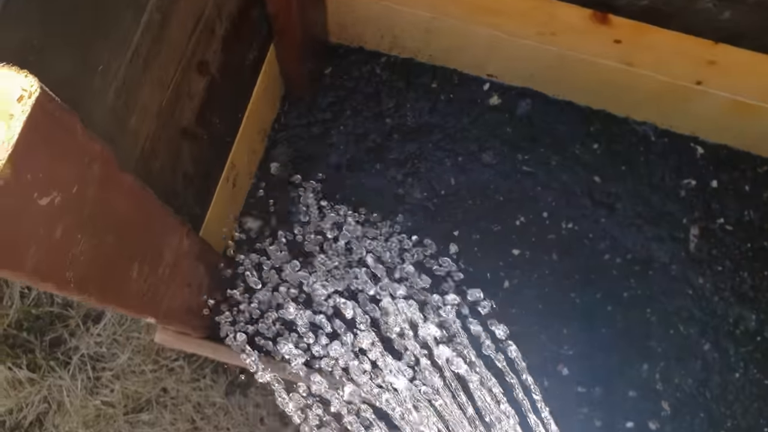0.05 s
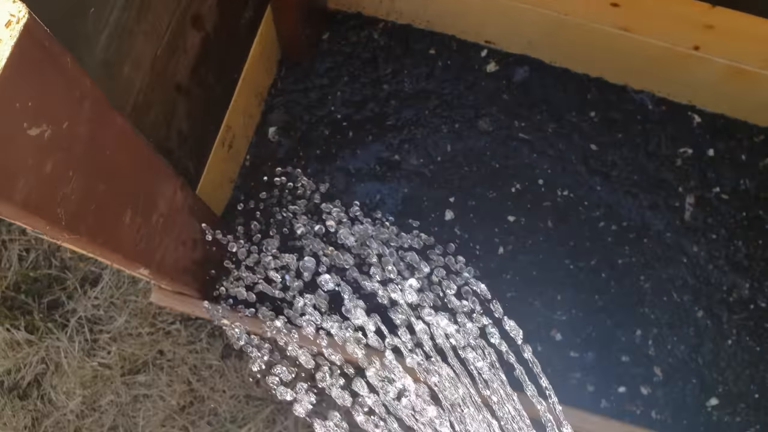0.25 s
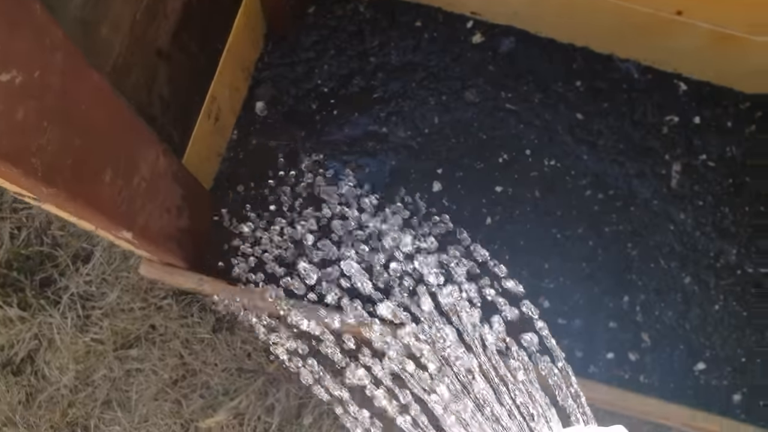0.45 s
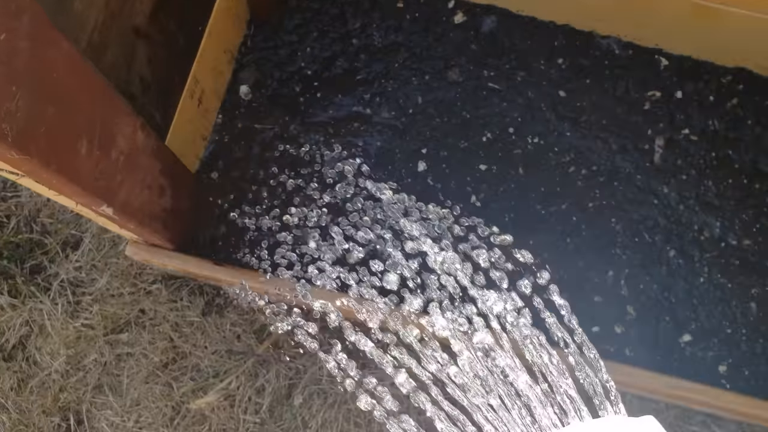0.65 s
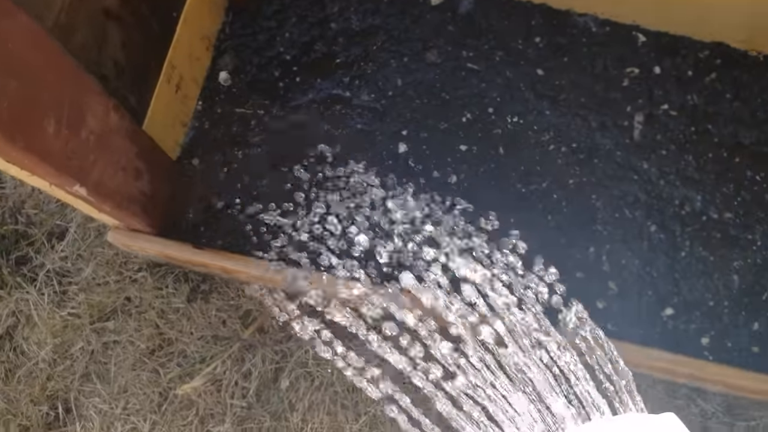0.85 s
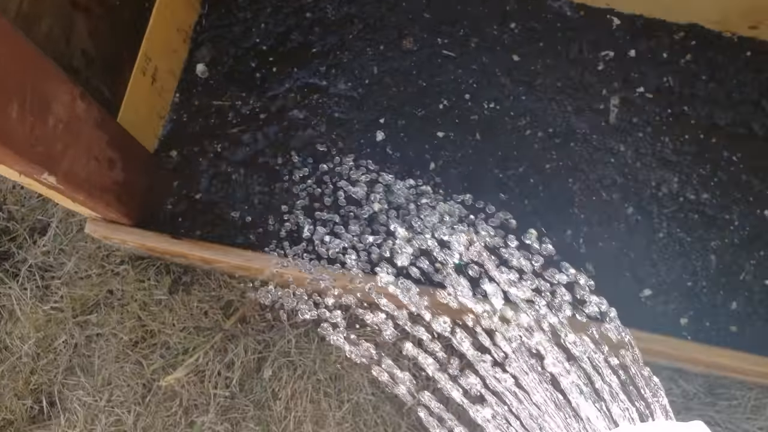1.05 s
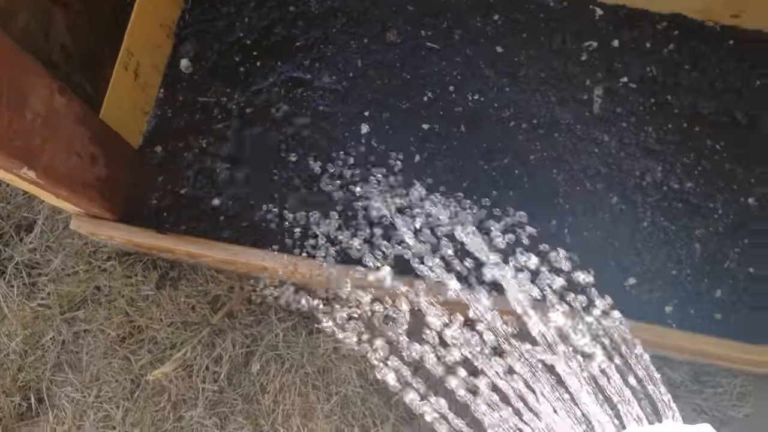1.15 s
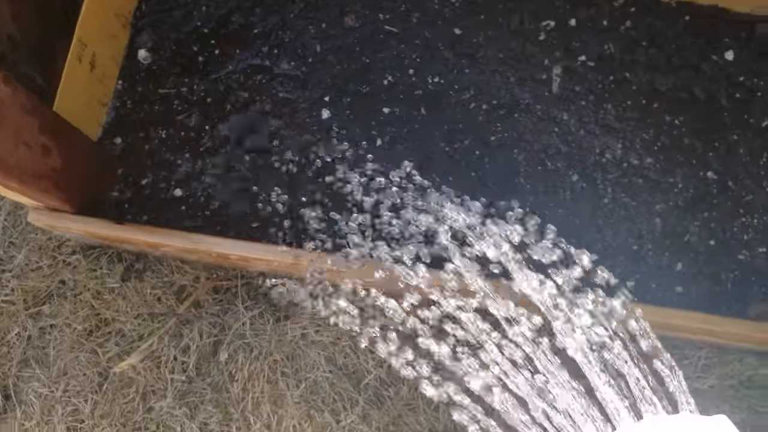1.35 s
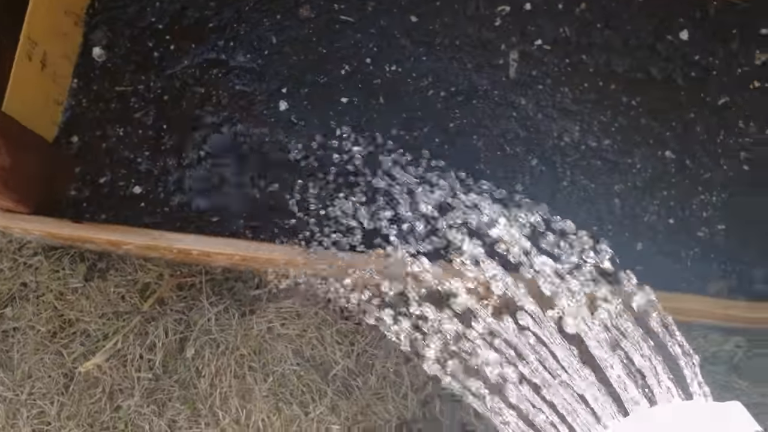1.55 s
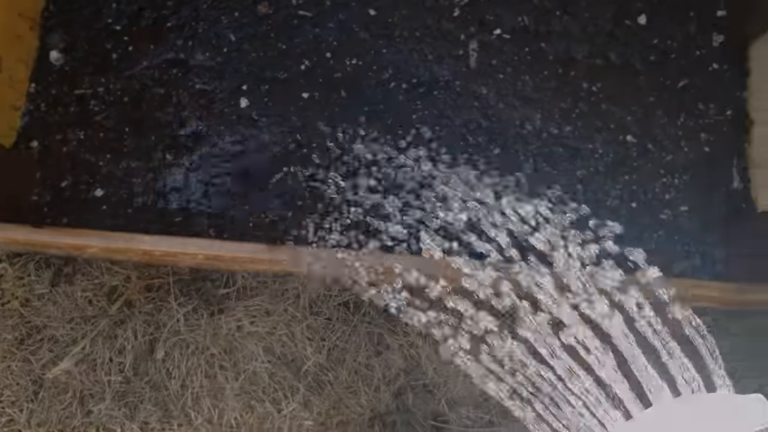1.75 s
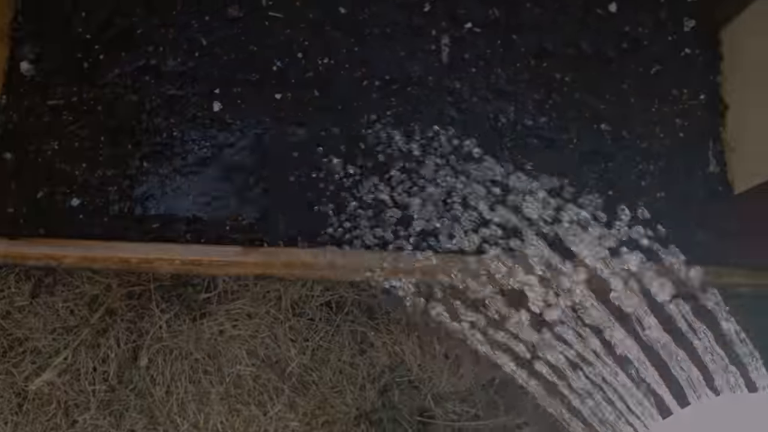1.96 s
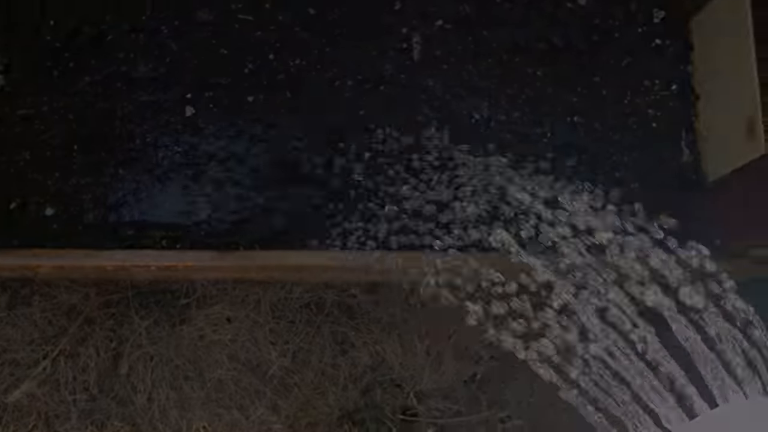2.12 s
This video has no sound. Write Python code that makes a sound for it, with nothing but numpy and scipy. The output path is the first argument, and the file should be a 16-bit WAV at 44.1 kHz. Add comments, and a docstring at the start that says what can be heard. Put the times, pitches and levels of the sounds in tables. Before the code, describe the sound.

Watering can rose sprinkling loose compost, crisp wet ticking and tiny pops, close on the left

```python
"""Watering can over loose compost

A watering can's rose sprinkles loose compost in a raised bed outdoors, close by and to the left.
Hundreds of drops a second tick on the wet crumbs (filtered impulses) and scatter into droplets (noise bursts);
trapped air pops in the pores, now and then with a deeper plop, and gurgles faintly (damped sine bubbles).
Blobs of water splat broadly. Fine mist hisses underneath, over a low outdoor rumble (both filtered noise)."""
import sys
import numpy as np
from scipy import signal
from scipy.fft import rfft, irfft
from scipy.io import wavfile

SR = 44100
rng = np.random.default_rng(int(sys.argv[2]) if len(sys.argv) > 2 else 0)


def file_out(sig):
    """Save sig as 16-bit WAV at sys.argv[1]."""
    # one column per channel
    cols = np.atleast_2d(sig).T
    # limit, then scale
    lim = np.clip(cols, -1, 1)
    pcm = np.round(lim * 32767).astype(np.int16)
    wavfile.write(sys.argv[1], SR, pcm)


N = 96490
TIME_S = np.arange(N) / SR


def from_db(db):
    """Amplitude ratio: 20 dB is a factor of ten in gain."""
    return 10 ** (np.asarray(db) / 20)


def in_time(rows):
    """Linear interpolation: each column of a curve at every sample."""
    s, *columns = np.transpose(rows)
    return [np.interp(TIME_S, s, column) for column in columns]


def about_mean(level_db):
    """Relative level: only the departures from the mean remain."""
    return level_db - level_db.mean()


def response(spectrum, size=4096):
    """Minimum phase: folding the cepstrum forward in time gives the causal impulse response of a spectrum."""
    hz, db = np.transpose(spectrum)
    bins_hz = np.maximum(np.arange(size // 2 + 1) * SR / size, 1)
    gain = from_db(np.interp(np.log(bins_hz), np.log(hz), db))
    cepstrum = irfft(np.log(gain))
    cepstrum[1:size // 2] *= 2
    cepstrum[size // 2 + 1:] = 0
    return irfft(np.exp(rfft(cepstrum)))


def colour(x, spectrum):
    """Linear filtering at unit energy: white noise takes the spectrum's shape and keeps its power."""
    h = response(spectrum)
    return signal.fftconvolve(x, h[None] / np.linalg.norm(h), axes=1)[:, :N]


def drift(rate_hz, size=8000):
    """Low-passed noise: two equal one-pole filters leave a smooth random wander with spread 1."""
    r = np.exp(-2 * np.pi * rate_hz / SR)
    slow = signal.lfilter([1], [1, -2 * r, r * r], rng.standard_normal(N + size))[size:]
    return slow / slow.std()


def shower(level_db, per_s, weakest_db, excess_db, range_db):
    """Random arrivals with truncated exponential levels, many weak and few strong: (time [s], level [dB])."""
    born = rng.random(N) < per_s / SR
    chance = rng.random(N) * (1 - np.exp(-range_db / excess_db))
    db = weakest_db + about_mean(level_db) - excess_db * np.log(1 - chance)
    return np.column_stack([TIME_S, db])[born]


def pitched(rows, centre_hz, spread_oct):
    """Bubble resonance: pitches scatter in octaves, mostly near the centre, at most two spreads away."""
    octaves = spread_oct * np.clip(rng.standard_normal(len(rows)), -2, 2)
    return np.column_stack([rows, centre_hz * 2 ** octaves])


LAG_S, LAG_SPREAD_S = .00007, .00005  # mean and spread of the delay on the right


def arrivals(s):
    """Interaural delay: the sample at which each impact reaches the left and, on average later, the right."""
    left = np.clip((s * SR).astype(int), 0, N - 1)
    lag_s = LAG_S + LAG_SPREAD_S * rng.standard_normal(N)
    lag = np.round(SR * lag_s).astype(int)
    return left, np.clip(left + lag[left], 0, N - 1)


def scatter(energy, splash_db, splash_s, echo_db, echo_s):
    """Exponential decay of energy: a quick splash of droplets and a fainter, longer echo off the boards."""
    power = 0
    for db, decay_s in ((splash_db, splash_s), (echo_db, echo_s)):
        r = np.exp(-1 / (decay_s * SR))
        decaying = signal.lfilter([0, 1 - r], [1, -r], energy + 1e-18)
        power = power + from_db(db) ** 2 * decaying
    return np.sqrt(power) * rng.standard_normal((2, N))


POP_HZ = 5200  # central pitch of the small pops, and reference for the rise times
CYCLES_FOLLOW_PITCH = .38  # large pockets die in fewer cycles: exponent of the pitch ratio
ROUGHNESS, GLIDE = .15, .03  # unevenness from cycle to cycle; spread of the pitch glide per rise time


def bubbles(rows, rise_cycles, size=700):
    """Damped resonance: trapped air swells for a cycle or two, wobbles, glides and is damped by the soil."""
    out, t = np.zeros((2, N + size)), np.arange(size) / SR
    chances = rng.standard_normal((len(rows), 64))
    for (_, db, hz), left, right, chance in zip(rows, *arrivals(rows[:, 0]), chances):
        cycles = t * hz
        age = cycles / (rise_cycles * (hz / POP_HZ) ** CYCLES_FOLLOW_PITCH)  # in rise times
        envelope = from_db(db) * age * np.exp(1 - age)
        wobble = 1 + ROUGHNESS * np.interp(cycles, np.arange(len(chance) - 1), chance[1:])
        glide = 1 + GLIDE * chance[0] * (age / 2 - 1)
        pop = envelope * wobble * np.sin(2 * np.pi * cycles * glide)
        out[0, left:left + size] += pop
        out[1, right:right + size] += pop
    return out[:, :N]


# spectrum of the hiss, relative: (frequency [Hz], density [dB per Hz])
MIST_SPECTRUM = [(60, -30), (250, -16), (450, -11), (650, -16), (900, -12), (1300, -15.5), (1900, -19.5),
                 (2600, -14), (4400, -12), (7000, -8), (8600, -17), (10100, -14), (12200, -5), (15000, 0),
                 (15800, 0), (17500, -30)]


def mist(level_db, mean_db=-49.5):
    """Superposition: the finest droplets are too many to tell apart and merge into a hiss."""
    hiss = colour(rng.standard_normal((2, N)), MIST_SPECTRUM)
    return from_db(mean_db + about_mean(level_db)) * hiss


# spectrum of the steady rumble, relative: (frequency [Hz], density [dB per Hz])
RUMBLE_SPECTRUM = [(15, -52), (28, -20), (40, -9), (58, 0), (110, 0), (180, -4.5), (280, -14), (500, -19),
                   (1000, -30), (4000, -50)]
# level of the steady rumble before panning: (time [s], level [dB])
RUMBLE_CURVE = [(0, -61.5), (.3, -63), (.6, -64), (1.5, -64), (1.7, -62), (2.19, -66)]
# spectrum of the swell, higher up, relative: (frequency [Hz], density [dB per Hz])
SWELL_SPECTRUM = [(40, -25), (120, 0), (190, 0), (400, -20), (2000, -50)]
SWELL_S, SWELL_WIDTH_S, SWELL_DB = 1.8, .36, -65  # centre, width, level before panning


def rumble(side_db=-21, pan_db=1.3):
    """Mid-side correlation: a low background nearly alike on both sides, with one soft swell near the end."""
    mid, side = colour(rng.standard_normal((2, N)), RUMBLE_SPECTRUM)
    bell = np.exp(-((TIME_S - SWELL_S) / SWELL_WIDTH_S) ** 2)
    swell = from_db(SWELL_DB) * bell * colour(rng.standard_normal((1, N)), SWELL_SPECTRUM)
    level = from_db(in_time(RUMBLE_CURVE)[0])
    centre = (level * mid + swell) * from_db([[pan_db], [-pan_db]])
    return centre + level * from_db(side_db) * side * [[1], [-1]]


# loud pops of trapped air: (time [s], nominal peak [dB], pitch [Hz])
LOUD_AIR_POPS = [(.0298, -33, 6300), (.0862, -38, 6400), (.1637, -38, 4700), (.2239, -37.5, 4400),
                 (.2638, -36, 5900), (.2757, -37, 3700), (.3097, -42, 2300), (.3352, -38, 4400),
                 (.3536, -38, 5600), (.4237, -35.5, 4300), (.4826, -36, 6400), (.538, -36, 4950),
                 (.6447, -32, 6400), (.7206, -38, 6750), (.751, -44, 1270), (.8123, -35, 3600),
                 (.8213, -35.5, 4500), (.8598, -35.5, 3400), (.8763, -37, 5210), (.8955, -43.5, 1370),
                 (.9806, -37, 6800), (1.1472, -35, 4200), (1.1527, -45, 1340), (1.1982, -32.5, 4750),
                 (1.2465, -25, 4450), (1.3345, -38, 6400), (1.4758, -39, 5900), (1.5192, -37, 6900),
                 (1.5719, -39.5, 4500), (1.6342, -27, 4500), (1.635, -34, 3400), (1.6841, -35, 5860),
                 (1.6927, -31.5, 4550), (1.7103, -28.5, 6100), (1.8044, -29.5, 5450), (1.9829, -36.5, 4900),
                 (2.1077, -33.5, 5100), (2.1482, -37, 6700)]
# spectrum of the splash after a pop, relative: (frequency [Hz], density [dB per Hz])
POP_SPLASH_SPECTRUM = [(1000, -27), (2400, -16), (4300, 0), (7000, 0), (8300, -17), (16000, -30)]


def pops(level_db):
    """Bubble resonance: air pops in the pores, lower where the pocket is larger, each with a small splash."""
    small = shower(level_db, per_s=330, weakest_db=-50.5, excess_db=5.5, range_db=8.5)
    small = pitched(small, POP_HZ, spread_oct=.37)
    direct = bubbles(np.vstack([LOUD_AIR_POPS, small]), rise_cycles=2.0)
    splash = scatter(direct[0] ** 2, splash_db=-5.5, splash_s=.002, echo_db=-8, echo_s=.008)
    return direct + colour(splash, POP_SPLASH_SPECTRUM)


def puddles(level_db):
    """Low bubble resonance: faint, dull gurgling where the soil is soaked."""
    gurgles = shower(level_db, per_s=520, weakest_db=-66, excess_db=3.5, range_db=12)
    return bubbles(pitched(gurgles, centre_hz=2150, spread_oct=.5), rise_cycles=1.15)


# heavy drops that tick sharply: (time [s], level before HEAVY_TRIM_DB [dB])
HEAVY_DROP_TICKS = [(0.0358, -18.5), (0.2425, -18.5), (0.2984, -23.0), (0.3110, -22.0), (0.3386, -17.0),
                    (0.4265, -23.0), (0.4637, -22.0), (0.5805, -24.0), (0.601, -23.5), (0.6288, -23.0),
                    (0.6386, -24.0), (0.6607, -20.0), (0.6677, -15.0), (0.7157, -22.0), (0.7750, -19.5),
                    (0.8435, -23.0), (0.9991, -20.5), (1.0529, -23.0), (1.1538, -24.0), (1.3946, -20.0),
                    (1.501, -24.0), (1.5183, -13.5), (1.6843, -25.0), (1.744, -26.5)]
HEAVY_TRIM_DB = -2.6
# spectrum of a tick, relative: (frequency [Hz], density [dB per Hz])
TICK_SPECTRUM = [(100, -50), (400, -38), (1900, -33), (4200, -23), (7000, -17.5), (8600, -26), (10100, -20),
                 (12000, -7), (14700, 0), (15800, 1), (17500, -30)]
RINGS_HZ, RING_DB, RING_Q = (12500, 13900, 15000), 3, 6  # each drop favours one of these pitches


def drops(level_db):
    """Impulsive excitation: drops strike the wet crumbs with short, bright ticks, each slightly ringing."""
    heavy = np.array(HEAVY_DROP_TICKS) + [0, HEAVY_TRIM_DB]
    light = shower(level_db, per_s=800, weakest_db=-41.5, excess_db=5, range_db=12)
    s, db = np.vstack([heavy, light]).T
    clicks = np.zeros((2, N))
    for side, at in enumerate(arrivals(s)):
        np.add.at(clicks[side], at, from_db(db))
    dealt, ring = rng.integers(0, len(RINGS_HZ), N), from_db(RING_DB)  # one ring pitch per sample
    ticks = 0
    for k, hz in enumerate(RINGS_HZ):
        own = clicks * (dealt == k) + 1e-18
        ringing = signal.lfilter(*signal.iirpeak(hz, RING_Q, fs=SR), own)
        ticks = ticks + (own + ring * ringing) / (1 + ring / 2)
    splash = scatter(clicks[0] ** 2, splash_db=-2.5, splash_s=.0009, echo_db=-6.5, echo_s=.004)
    h = response(TICK_SPECTRUM)
    peak_scale = np.linalg.norm(h) / np.abs(h).max()  # from unit energy to unit peak
    return colour(ticks + splash, TICK_SPECTRUM) * peak_scale


# blobs of water that burst in a broad splat: (time [s], level [dB])
BIG_BLOBS = [(.263, -40), (.275, -40), (.289, -42), (.353, -40), (.408, -40), (.537, -41), (.638, -41),
             (.82, -42), (.865, -40), (.98, -40), (1.013, -42), (1.147, -40), (1.519, -44), (1.676, -41),
             (1.684, -42), (1.72, -40), (1.974, -42), (2.108, -43)]
# spectrum of a splat, relative: (frequency [Hz], density [dB per Hz])
SPLAT_SPECTRUM = [(100, -40), (600, -22), (1000, -16), (1900, -18), (2700, -7), (4300, -1), (7100, 0),
                  (8400, -13), (10100, -12), (12200, -3), (15700, 0), (17500, -30)]


def splats(level_db, rise_s=.0012):
    """Noise burst: blobs of water spread on soaked soil in a few milliseconds of broad spatter."""
    small = shower(level_db, per_s=100, weakest_db=-55, excess_db=6, range_db=8)
    s, db = np.vstack([BIG_BLOBS, small]).T
    energy = np.zeros(N)
    np.add.at(energy, arrivals(s)[0], from_db(db) ** 2)
    age = np.arange(N // 50) / (rise_s * SR)  # in rise times
    power = np.abs(signal.fftconvolve(energy, age * np.exp(1 - age))[:N])
    return colour(np.sqrt(power) * rng.standard_normal((2, N)), SPLAT_SPECTRUM)


# slow levels of the spray, of which only the departures from the mean count:
# (time [s], treble [dB], middle [dB], low-middle [dB])
SPRAY_LEVELS = [(0.02, -47, -56, -69), (0.53, -46, -56.5, -70), (0.96, -48, -56, -68.5),
                (1.25, -50, -57.5, -74), (1.65, -50, -57, -74), (2.16, -52, -58, -74.5)]
# gain of the spray on the right: (frequency [Hz], gain [dB])
RIGHT_SHADE = [(200, -6), (1000, -12), (3000, -13), (5500, -11), (7200, -14), (8600, -8), (10500, -10),
               (12500, -19), (15000, -21)]
CLUMP_DB, CLUMP_HZ = 1.8, 45  # spread and rate of the clumping


def scene():
    """Acoustic shadow: the spray falls in clumps on the left and reaches the right side shaded."""
    treble_db, middle_db, low_db = in_time(SPRAY_LEVELS)
    clumps_db = CLUMP_DB * drift(CLUMP_HZ)
    background = rumble()
    spray = mist((treble_db + low_db) / 2)
    spray = spray + pops(middle_db + clumps_db)
    spray = spray + puddles(low_db + clumps_db)
    spray = spray + drops(treble_db + clumps_db)
    spray = spray + splats(middle_db + clumps_db)
    left, right = spray
    shaded = signal.fftconvolve(right, response(RIGHT_SHADE))[:N]
    return np.array([left, shaded]) + background


def record(dry, cutoff_hz=15800):
    """Linear-phase low-pass: the top is cut steeply."""
    lowpass = signal.firwin(601, cutoff_hz, window=("kaiser", 7), fs=SR)
    return signal.fftconvolve(dry, lowpass[None], "same", axes=1)


dry = scene()
out = record(dry)
file_out(out)
```